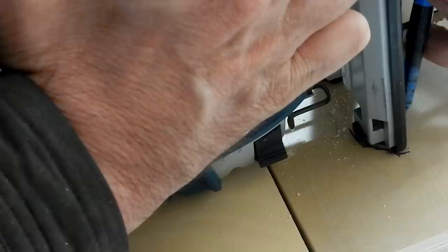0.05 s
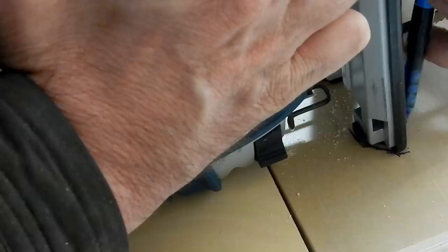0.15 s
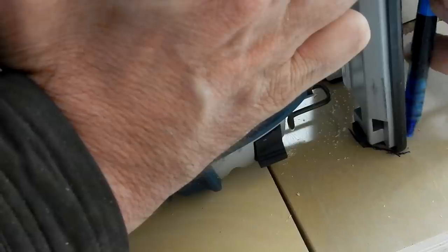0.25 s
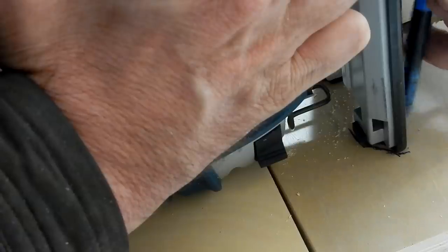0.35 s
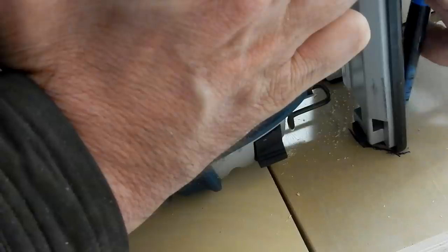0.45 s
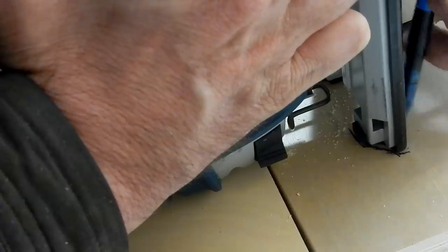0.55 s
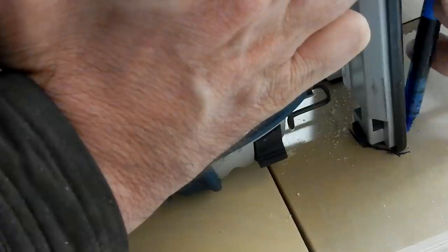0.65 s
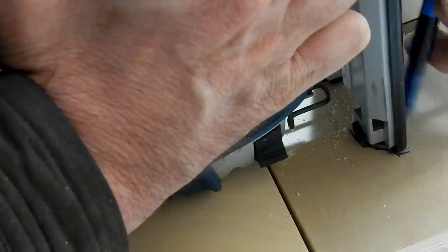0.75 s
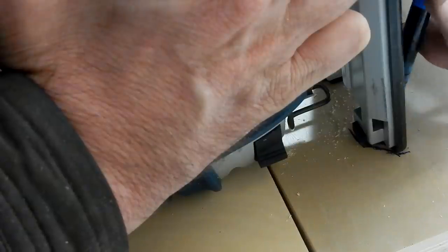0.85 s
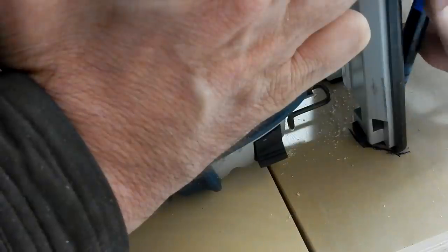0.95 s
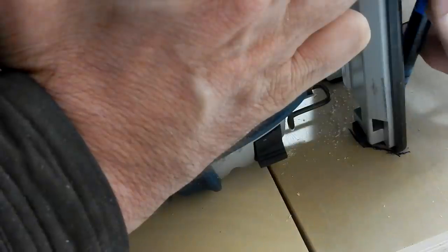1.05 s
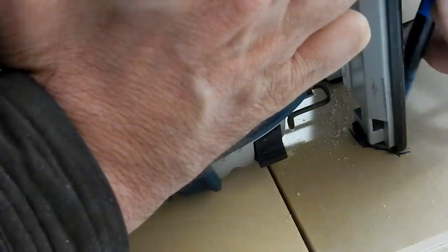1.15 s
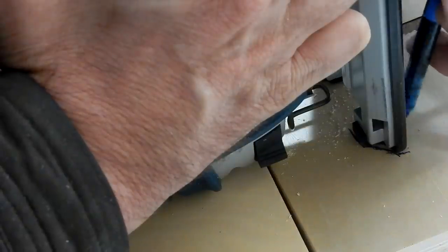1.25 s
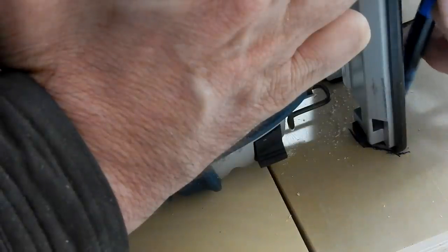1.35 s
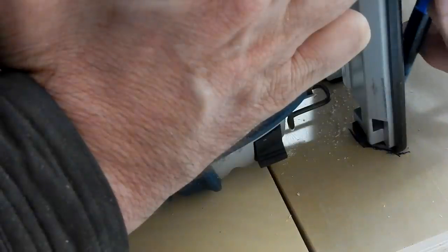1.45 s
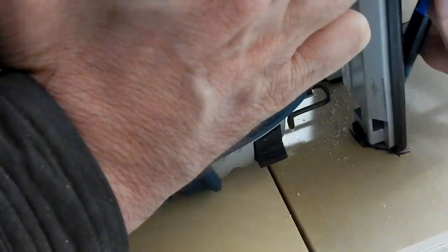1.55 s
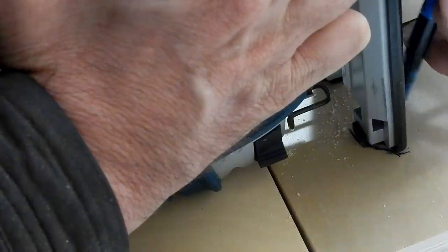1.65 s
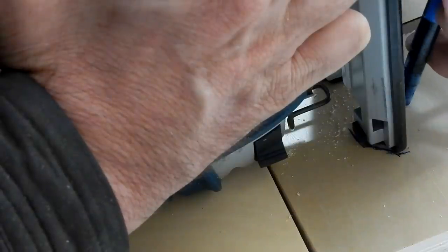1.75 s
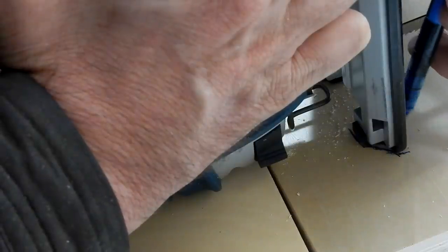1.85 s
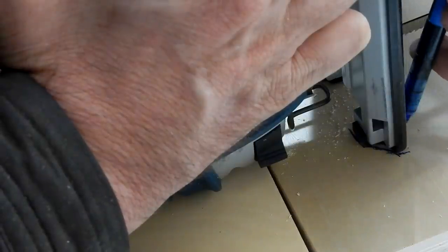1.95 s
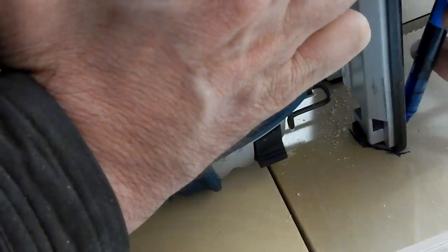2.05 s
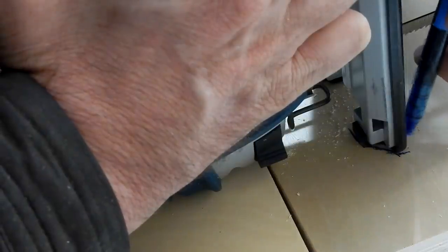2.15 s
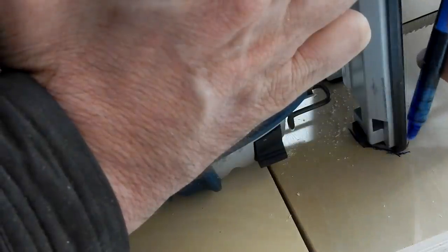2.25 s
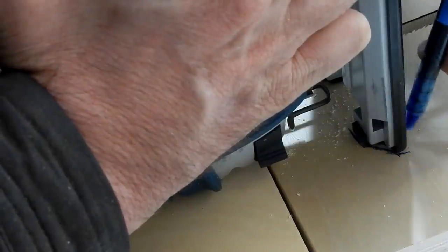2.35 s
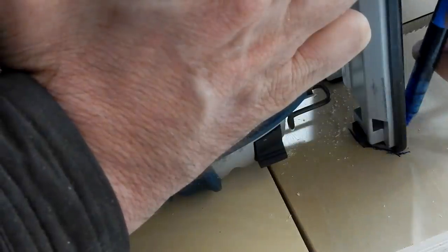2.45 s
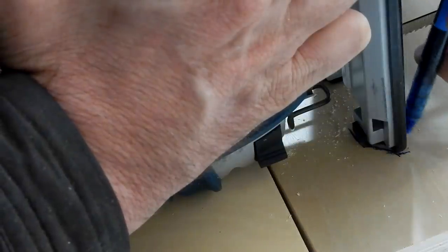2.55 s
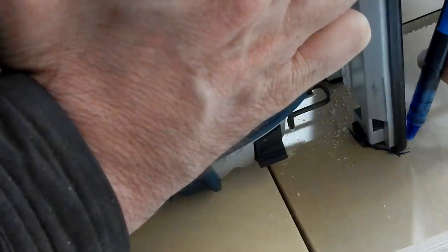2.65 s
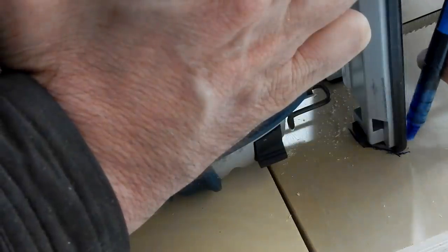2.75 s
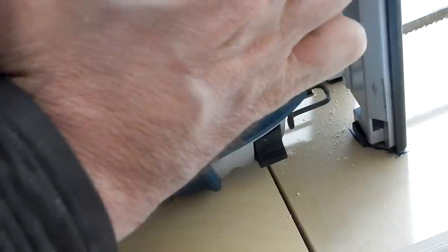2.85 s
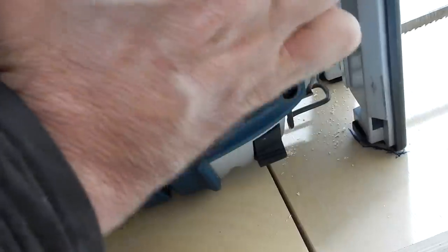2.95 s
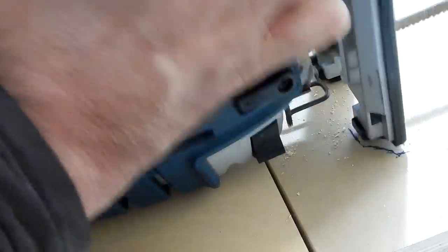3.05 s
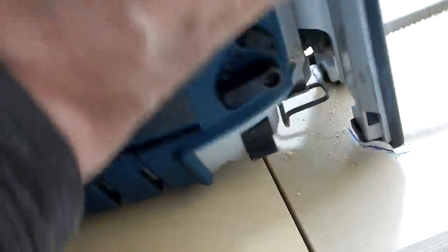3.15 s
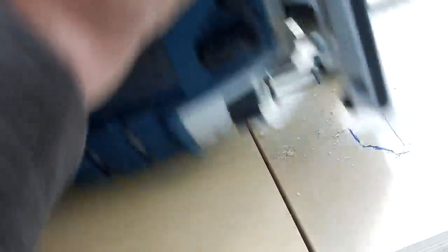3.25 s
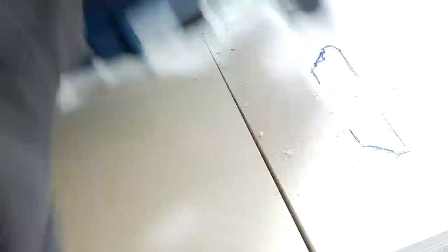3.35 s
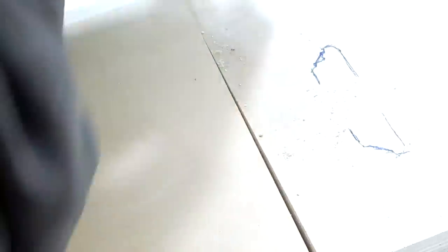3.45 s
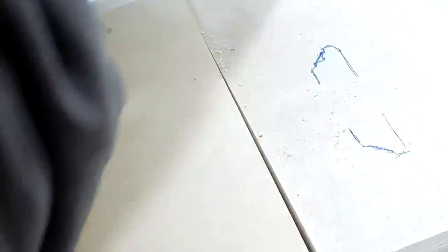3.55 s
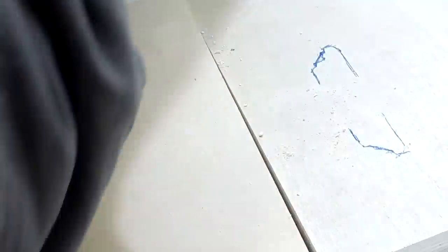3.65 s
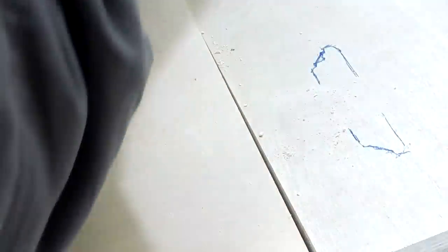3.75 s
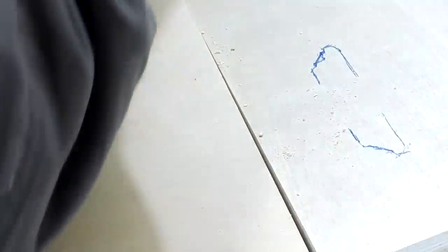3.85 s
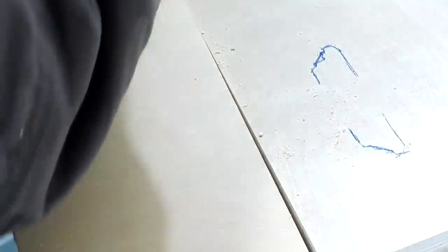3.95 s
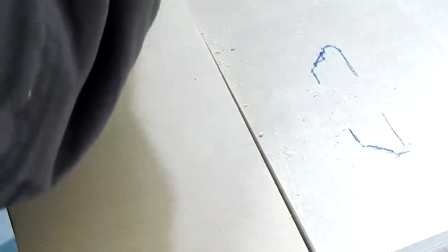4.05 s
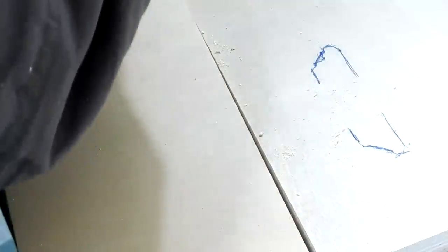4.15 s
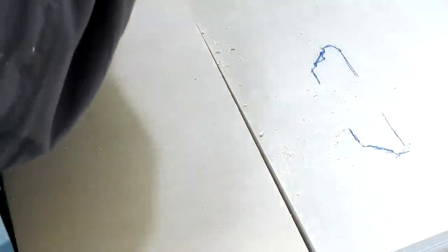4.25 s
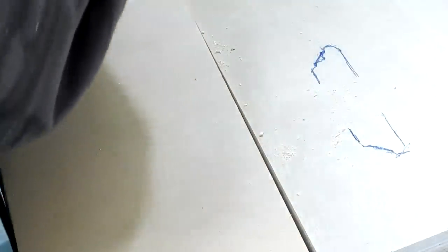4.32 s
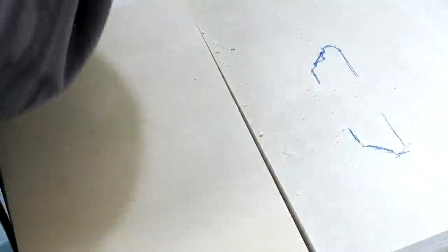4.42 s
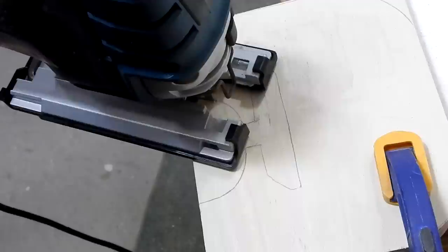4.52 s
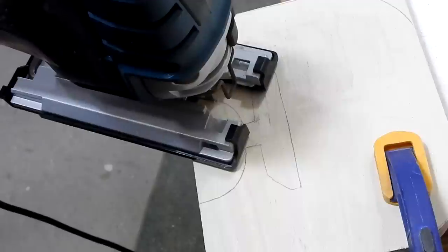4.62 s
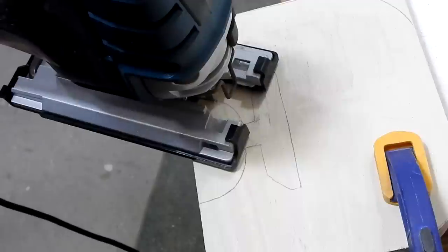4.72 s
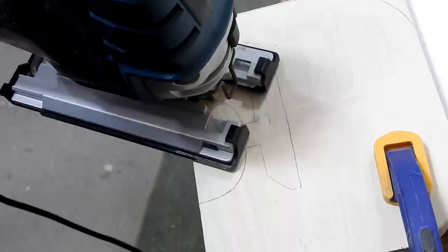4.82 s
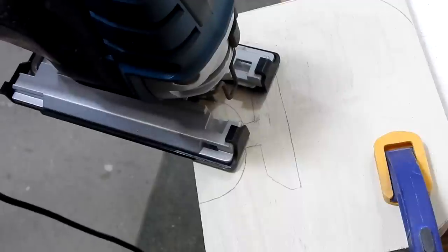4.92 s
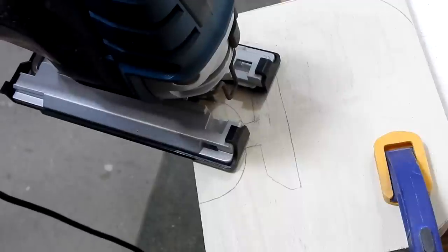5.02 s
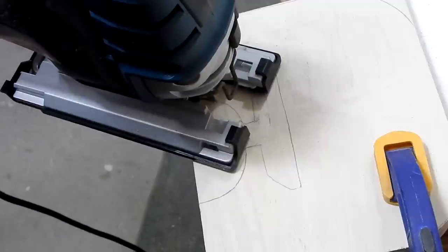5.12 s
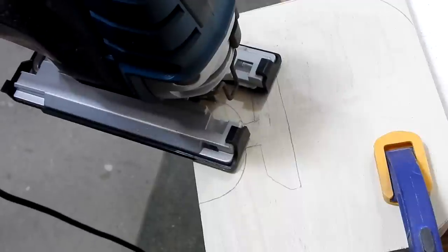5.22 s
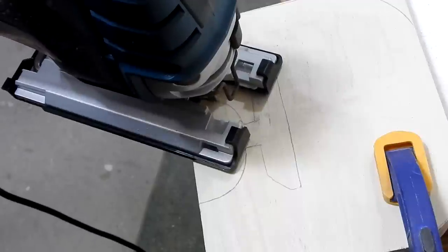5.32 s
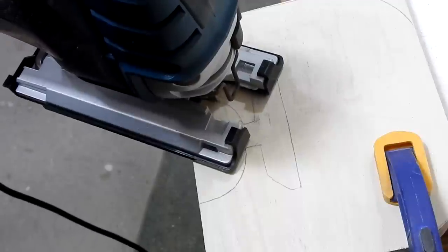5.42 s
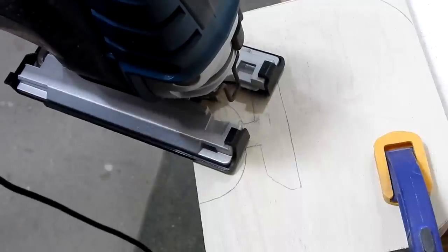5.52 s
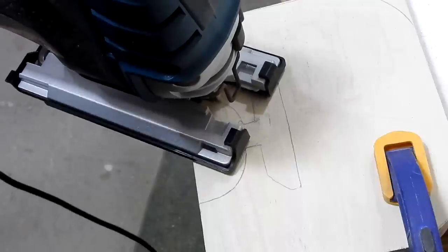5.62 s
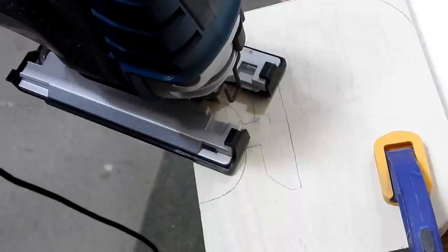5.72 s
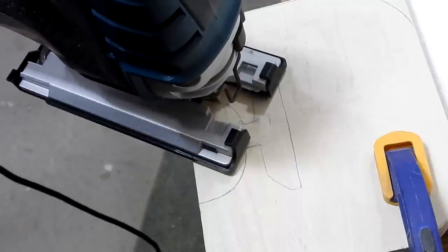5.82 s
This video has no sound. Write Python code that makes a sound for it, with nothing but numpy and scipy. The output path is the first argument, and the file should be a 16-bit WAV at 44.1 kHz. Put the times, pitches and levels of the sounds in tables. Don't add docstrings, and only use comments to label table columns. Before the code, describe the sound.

Close stereo microphone at a workshop bench: low room rumble, faint pen scratches and small ticks along a jigsaw's metal shoe. Around three seconds the tool is lifted with a knock and a sharp steel clack, cloth and dull scrapes follow, then it lands with a heavy woody thump. An abrupt cut brings the loud jigsaw, rattling, rasping and whining steadily to the end.

```python
import sys
import numpy as np
from scipy import signal
from scipy.fft import rfft, irfft, next_fast_len
from scipy.io import wavfile
from scipy.ndimage import map_coordinates

SR = 44100
rng = np.random.default_rng(int(sys.argv[2]) if len(sys.argv) > 2 else 0)


def pcm_store(signal):
    levels = np.round(np.clip(np.atleast_2d(signal), -1, 1) * 32767)
    wavfile.write(sys.argv[1], SR, levels.astype(np.int16).T)


def linear_from_db(decibels):
    return 10 ** (np.asarray(decibels, float) / 20)


N = 259308
T = np.arange(N) / SR
CUT_S = 4.566
RUNNING = T > CUT_S


def unit(x):
    return x / np.sqrt(np.mean(x ** 2) + 1e-20)


def along(points, hz):
    f, v = np.transpose(points)
    return np.interp(np.log(hz + 1), np.log(f + 1), v)


def curves(rows):
    s, *columns = np.transpose(rows)
    return [np.interp(T, s, column) for column in columns]


def wobble(rate_hz):
    knots = rng.standard_normal(int(N * rate_hz / SR) + 4)
    return map_coordinates(knots, [T * rate_hz])


def filtered(x, response):
    m = next_fast_len(N + 8192)
    return irfft(rfft(x, m) * response(np.fft.rfftfreq(m, 1 / SR)), m)[..., :N]


def resonant(x, modes):
    def response(f):
        total = 0
        for k, (hz, width, db) in enumerate(modes):
            total = total + (-1) ** k * linear_from_db(db) * 1j * f * width / (hz * hz - f * f + 1j * f * width)
        return total
    return filtered(x, response)


def rush(spectrum, alike, grit_db=0.):
    pair = rng.standard_normal((2, N)) * linear_from_db(grit_db * wobble(300))

    def response(hz):
        angle = np.arccos(np.clip(along(alike, hz), -1, 1)) / 2
        return linear_from_db(along(spectrum, hz)) * np.array([np.cos(angle), np.sin(angle)])
    mid, side = filtered(pair, response)
    return unit(np.array([mid + side, mid - side]))


def swells(rows):
    return sum(linear_from_db(db) * np.exp(-((T - s) / (0.36 * length)) ** 2) for s, length, db in rows)


def ring(modes, length_s, spread_db):
    t = np.arange(int(length_s * SR)) / SR
    tone = np.zeros(len(t))
    for hz, db, t60 in modes:
        tone += linear_from_db(db + spread_db * rng.normal() - 60 * t / t60) * np.sin(2 * np.pi * hz * t)
    return tone * (1 - np.exp(-t / 0.0013))


def add(into, s, x):
    into[round(s * SR):][:len(x)] += x


# start_s, level_db
THUMPS = [
    (.003, -32),
    (3.254, -38),
    (3.285, -34.5),
    (3.322, -45),
    (3.808, -46),
    (4.121, -20.5),
    (4.16, -15),
    (4.18, -20.5),
    (4.338, 2),
    (4.448, -34),
]
# pitch_hz, level_db, t60_s
BOARD_MODES = [(111, -12, 0.2), (160, -3, 0.22), (171, -4.5, 0.22), (205, -12, 0.16), (250, 0, 0.06),
               (305, -6, 0.08), (430, -9, .06)]


def board_thumps():
    out = np.zeros(N + SR)
    for s, db in THUMPS:
        add(out, s, linear_from_db(db - 4.5) * ring(BOARD_MODES, 0.4, spread_db=2.0))
    return out[:N]


# pitch_hz, likeness
ROOM_ALIKE = [(60, 1), (130, 0.86), (290, 0.74), (640, 0.77), (1410, 0.73), (3100, 0.68), (6820, 0.4),
              (15000, 0.12)]
# pitch_hz, density_db_per_hz
RUMBLE = [(12, -60), (20, -28), (43, -4), (65, -1), (91, -1), (108, -9), (151, -10), (220, -26),
          (250, -16.5), (320, -70), (550, -120)]
# pitch_hz, density_db_per_hz
SCRAPE = [(300, 1), (600, 1.5), (900, 4.5), (1500, 1.5), (2500, -2), (4000, -6), (6000, -14), (9000, -39)]
# pitch_hz, density_db_per_hz
HISS = [(3000, -19), (5000, 5), (8000, 3), (11000, -1), (13500, -1.5), (15000, -9), (16000, -30)]
# pitch_hz, density_db_per_hz
DRAG = [(100, -43), (180, -1.5), (400, -6.5), (800, -12), (1300, -35)]
# pitch_hz, width_hz, rms_db
HUMS = [(1750, 83, -71), (9600, 150, -81)]
# start_s, rubbing_db
BUSY = [(0.0, -59.5), (1.09, -58), (1.94, -61.5), (2.89, -59.5), (3.04, -51.5), (3.19, -54), (3.36, -41.5),
        (3.51, -53.5), (3.73, -53.5), (4.17, -56), (4.3, -48.5), (4.55, -50)]
# middle_s, length_s, level_db
SLEEVE_STROKES = [(0.261, 0.037, -54.5), (1.218, 0.023, -55.5), (2.215, 0.034, -50), (2.266, 0.043, -53),
                  (2.923, 0.098, -51), (3.129, 0.034, -40), (3.545, 0.17, -43.5), (3.668, 0.17, -52.5),
                  (3.735, 0.092, -56), (4.148, 0.0097, -37), (4.256, 0.37, -48), (4.31, 0.082, -50),
                  (.01, 0.04, -51)]
HISS_DB, HISS_FOLLOWS = -69, 1
DRAG_DB, DRAG_FOLLOWS, SLEEVE_DRAG_DB = -58, 0.26, -4
RUMBLE_DB, RUMBLE_FOLLOWS = -47, 0.14
REST_DB = -60
BUZZ_DB, BUZZ_T60_S = -29, 0.18


def bench():
    busy_db = curves(BUSY)[0]
    swing_db = busy_db - REST_DB
    rumble_db = RUMBLE_DB + RUMBLE_FOLLOWS * swing_db + 1.8 * wobble(5.65)
    rumble = linear_from_db(rumble_db) * rush(RUMBLE, ROOM_ALIKE)
    scrape = linear_from_db(busy_db) * rush(SCRAPE, ROOM_ALIKE, grit_db=1.5)
    hiss = linear_from_db(HISS_DB + HISS_FOLLOWS * swing_db) * rush(HISS, ROOM_ALIKE, grit_db=2.0)
    buzz = sum((T > s) * linear_from_db(db + BUZZ_DB - 60 * np.abs(T - s) / BUZZ_T60_S) for s, db in THUMPS)
    drag_gain = linear_from_db(DRAG_DB + DRAG_FOLLOWS * swing_db) + buzz + linear_from_db(SLEEVE_DRAG_DB) * swells(SLEEVE_STROKES)
    drag = drag_gain * rush(DRAG, ROOM_ALIKE)
    hums = np.zeros(N)
    for hz, width, db in HUMS:
        once = resonant(rng.standard_normal(N), [(hz, width, 0)])
        hums += linear_from_db(db) * unit(resonant(once, [(hz, width, 0)]))
    return rumble + scrape + hiss + drag + hums


# middle_s, length_s, level_db
PEN_STROKES = [(.42, 0.076, -50), (.462, 0.016, -57), (0.631, 0.048, -55), (0.691, 0.019, -52.5),
               (0.85, 0.09, -53), (1.29, 0.078, -61), (1.415, 0.029, -52.5), (1.47, 0.037, -54),
               (1.717, 0.095, -60), (1.93, 0.11, -63.5), (3.175, 0.073, -40.5), (3.385, 0.028, -51),
               (3.942, 0.18, -62), (4.362, 0.071, -40)]
# start_s, t60_s, dull_db, bright_db
WAKES = [
    (.838, 0.14, -52, -53),
    (2.835, 0.56, -54.5, -68),
    (3.13, 0.077, -58, -54),
    (3.258, 0.13, -44.5, -70),
    (3.335, 0.19, -40, -37.5),
    (3.481, 0.39, -40.5, -75),
    (4.118, 0.059, -38, -71),
    (4.159, 0.094, -38.5, -53),
    (4.338, 0.19, -24, -46),
]
# middle_s, length_s, level_db
SWISHES = [
    (3.95, 0.14, -53.5),
    (4.25, .16, -52),
    (3.6, 0.13, -54),
    (1.02, .25, -63),
]
# pitch_hz, density_db_per_hz
PEN = [(3000, -38), (4700, 6.5), (5600, 4), (7500, 5.5), (9000, 3), (11500, -3), (13500, -2), (15500, -8),
       (16200, -40)]
# pitch_hz, density_db_per_hz
CUFF = [(1500, -30), (2600, -3), (3400, 0), (4300, -6), (7000, -23)]
# pitch_hz, likeness
NEAR_ALIKE = [(500, 1), (10000, 0.89)]
PEN_SHINE_DB, SLEEVE_SHINE_DB = -2.5, -17


def strokes():
    pen, sleeve = swells(PEN_STROKES), swells(SLEEVE_STROKES)
    wakes = np.array([(T > s) * linear_from_db(-60 * np.abs(T - s) / t60) for s, t60, *_ in WAKES])
    dull, bright = linear_from_db(np.array(WAKES)[:, 2:].T) @ wakes
    dull = dull + pen + sleeve
    bright = bright + linear_from_db(PEN_SHINE_DB) * pen + linear_from_db(SLEEVE_SHINE_DB) * sleeve
    grain = linear_from_db(1.3 * wobble(120) + 2.1 * wobble(35))
    rubbing = grain * (dull * rush(SCRAPE, NEAR_ALIKE) + bright * rush(PEN, NEAR_ALIKE))
    return rubbing + swells(SWISHES) * rush(CUFF, NEAR_ALIKE)


# start_s, peak_db, ring_hz
PEN_TICKS = [(0.243, -47, 1620), (0.307, -43, 2000), (0.63, -32, 764), (0.652, -29, 1550),
             (0.685, -34, 905), (0.838, -39, 859), (1.217, -32, 950), (1.41, -36.5, 2640),
             (1.428, -38, 600), (2.012, -44, 1760), (2.206, -35, 802), (2.266, -29.5, 4270),
             (2.524, -26.5, 2520), (2.941, -29, 630), (3.387, -30, 1350), (4.525, -26, 1630)]
# start_s, peak_db, ring_hz
TOOL_TICKS = [(2.519, -30.5, 970), (2.918, -31.5, 3340), (3.124, -16, 3000), (3.138, -28, 633),
              (3.168, -24.5, 603), (3.257, -23.5, 600), (3.481, -27, 3000), (3.725, -34, 1340),
              (3.864, -39, 654), (4.117, -19.5, 680), (4.145, -23, 1220), (4.156, -23, 800),
              (4.339, -11, 2770)]
PEN_BRIGHT_DB, TOOL_BRIGHT_DB, TICK_T60_S = -9, -35, 0.016
SOFT_HZ = 6430


def ticks():
    out, t = np.zeros(N + SR), np.arange(SR // 8) / SR
    soft = signal.butter(2, SOFT_HZ, fs=SR)
    rise = 1 - np.exp(-t / 0.00034)
    for rows, bright_db in ((PEN_TICKS, PEN_BRIGHT_DB), (TOOL_TICKS, TOOL_BRIGHT_DB)):
        for s, db, hz in rows:
            grit = rng.standard_normal((2, len(t)))
            dull = signal.lfilter(*soft, signal.lfilter(*signal.iirpeak(hz, 1.2, SR), grit[0]))
            bright = signal.lfilter(*signal.iirpeak(5200, 1.1, SR), grit[1])
            decay = linear_from_db(db - 4.0 - 60 * t / TICK_T60_S)
            add(out, s, rise * decay * (unit(dull) + linear_from_db(bright_db) * unit(bright)))
    return out[:N]


# start_s, peak_db, crack_t60_s
CLACK = [
    (3.3234, -6.5, 0.013),
    (3.3272, -9.5, 0.018),
    (3.3308, -14, 0.023),
]
# pitch_hz, width_hz, level_db
STEEL = [(348, 170, -7), (605, 110, 0), (1321, 45, 6), (1570, 110, 6), (2250, 200, -5), (3230, 500, -4),
         (6800, 950, -25.5)]
# pitch_hz, level_db, t60_s
SHOE_MODES = [(1340, -38, 0.35), (1356, -39, 0.33), (1606, -38, 0.3)]


def shoe_clack():
    chatter, tail, t = np.zeros(N + SR), np.zeros(N + SR), np.arange(SR // 8) / SR
    for s, db, t60 in CLACK:
        add(chatter, s, linear_from_db(db - 60 * t / t60) * rng.standard_normal(len(t)))
    add(tail, CLACK[0][0], ring(SHOE_MODES, 0.46, spread_db=2.0))
    chatter = chatter[:N]
    soft = signal.butter(2, SOFT_HZ, fs=SR)
    crack = signal.lfilter(*soft, signal.lfilter(*signal.iirpeak(2600, 0.5, SR), chatter))
    return tail[:N] + linear_from_db(4.5) * crack + linear_from_db(11.0) * resonant(chatter, STEEL)


# pitch_hz, t60_s
SHOP = [(200, 0.47), (2000, 0.54), (10000, 0.064)]


def shop(x):
    hz, t, z = signal.stft(rng.standard_normal((2, SR // 2)), SR, nperseg=256)
    decay = linear_from_db(-60 * t / along(SHOP, hz)[:, None])
    mid, side = signal.istft(z * decay, SR, nperseg=256)[1]
    tail = mid + 0.071 * np.array([side, -side])
    late = np.pad(x, (300, 0))[None]
    return signal.fftconvolve(late, tail / np.linalg.norm(tail[0]), axes=1)[:, :N]


# start_s, whine_hz
SPEED = [(4.58, 11505), (4.66, 11510), (4.745, 11445), (4.85, 11515), (4.95, 11480), (5.06, 11470),
         (5.2, 11530), (5.27, 11490), (5.33, 11520), (5.5, 11450), (5.57, 11465), (5.68, 11495),
         (5.8, 11525), (5.88, 11520)]
STROKE_HZ, KNOCK_S = 28.75, 5.3463


def gearing():
    whine_hz = curves(SPEED)[0]
    turn = np.cumsum(STROKE_HZ * whine_hz / whine_hz[RUNNING].mean()) / SR
    return whine_hz, turn - turn[round(KNOCK_S * SR)]


def blows(turn, share, jitter, scatter_db):
    at = np.flatnonzero(np.diff(np.floor(turn - share + jitter * wobble(8))) > 0)
    train = np.zeros(N)
    train[at] = linear_from_db(scatter_db * (0.51 * wobble(8.7) + wobble(40)))[at]
    return train


# share_after_knock, plate_db, shell_db, guide_db
CONTACTS = [(-.06, 3.5, -0.5, -10), (.03, -3, 0, -0.5), (.1, 6, 1.5, 1), (0.191, 0, -7, 1.5),
            (0.33, 8.5, 2.5, -0.5), (.47, 8.5, 0.5, -4), (.54, -3, 1.5, 2.5), (0.671, 6.5, 2.5, -1.5),
            (0.791, -20, -4, -12)]
# pitch_hz, width_hz, level_db
PLATE = [(672, 45, -12.5), (890, 55, -3)]
# pitch_hz, width_hz, level_db
SHELL = [(1068, 83, 1.5), (1190, 71, 4), (1473, 97, -2.5)]
# pitch_hz, width_hz, level_db
GUIDE = [(1835, 51, -1.5), (2020, 120, -5), (2334, 93, 0.5), (2666, 92, -4), (3430, 140, -1.5)]
RATTLE_DB, RATTLE_SAGS_DB_PER_S = -2.5, 1.5


def gear_rattle(turn, load_db):
    hits = np.array([blows(turn, share, jitter=0.0027, scatter_db=2.24) for share, *_ in CONTACTS])
    into = linear_from_db(np.array(CONTACTS)[:, 1:].T) @ hits
    rattle = sum(resonant(x, modes) for x, modes in zip(into, (PLATE, SHELL, GUIDE)))
    level_db = load_db + RATTLE_DB - RATTLE_SAGS_DB_PER_S * (T - CUT_S)
    return linear_from_db(level_db + 1.15) * rattle / rattle[RUNNING].std()


# pitch_hz, width_hz, level_db
ROD = [(1800, 400, -7), (2300, 300, -5), (3400, 500, 0), (4400, 700, -6), (6300, 1500, -15)]
# pitch_hz, width_hz, level_db
THUD = [(530, 98, -9), (694, 77, 6.5), (1240, 570, -12)]
# pitch_hz, density_db_per_hz
CHIPS = [(2500, -33), (3500, -10), (6000, 2), (10000, 0), (15000, -15)]
# pitch_hz, likeness
SAW_ALIKE = [(60, 0.93), (130, 0.99), (290, 1), (640, 0.92), (1410, 0.99), (3100, 0.91), (6820, 0.87),
             (15000, 0.66)]
CHIPS_DB, CHIPS_T60_S = -10.5, 0.014


def rod_knock(turn, knock_db):
    blow = np.convolve(blows(turn, 0, jitter=0.002, scatter_db=0.8), np.hanning(7)[1:-1] / 3, "same")
    rod = linear_from_db(knock_db + 32.5) * resonant(blow, ROD)
    thud = linear_from_db(knock_db + 25.0) * resonant(np.roll(blow, -70), THUD)
    spray = signal.fftconvolve(blow, linear_from_db(-60 * T[:SR // 20] / CHIPS_T60_S))[:N]
    return rod + thud + linear_from_db(knock_db + CHIPS_DB) * spray * rush(CHIPS, SAW_ALIKE)


# stroke_rate_multiple, rms_db
ORDERS = [(2, -75), (3, -48), (5, -47.5), (6, -52), (7, -56), (8, -54.5), (9, -48), (10, -55), (11, -38),
          (12, -48), (13, -38.5), (17, -38)]


def balance_tones(turn):
    tones = np.zeros(N)
    for k, db in ORDERS:
        level = linear_from_db(db + 1.2 * wobble(7))
        cycles = k * turn + rng.random() + 0.024 * 1.2 * wobble(7)
        tones += level * np.sin(2 * np.pi * cycles)
    return tones


# pitch_hz, density_db_per_hz
TEETH = [(60, -41), (250, -21), (520, -10.5), (850, -7), (1200, -9), (1550, -2), (1850, -4), (2050, -5.5),
         (2320, 3.5), (2520, -12.5), (2750, -2.5), (3050, -4.5), (3420, -7), (4300, -12), (6000, -46)]
# pitch_hz, density_db_per_hz
FAN = [(3000, -12), (4500, 0.5), (6000, -3), (7000, -1), (8000, -0.5), (9500, 2), (10300, -0.5),
       (11300, 3.5), (12200, -2.5), (13500, -8), (15600, -9), (15900, -60)]
TEETH_DB, FAN_DB, FAN_FOLLOWS = -2.5, -29, 0.86


def teeth_and_fan(turn, load_db):
    bite = linear_from_db(-4.5 * (1 - np.cos(2 * np.pi * (turn - 0.13))))
    rasp = linear_from_db(load_db + TEETH_DB + 1.0) * bite * rush(TEETH, SAW_ALIKE, grit_db=-1.0)
    fan_db = FAN_DB + FAN_FOLLOWS * (load_db - load_db[RUNNING].mean())
    return rasp + linear_from_db(fan_db + 2.5) * bite ** 0.14 * rush(FAN, SAW_ALIKE)


def commutator_whine(turn, whine_hz, whine_db):
    lead_rad = np.array([[0.85], [-0.85]])
    side_db = np.array([[7], [0.6]])
    spin = 2 * np.pi * np.cumsum(whine_hz + 6 * wobble(60)) / SR + lead_rad
    tone = np.sin(spin) + 0.11 * np.sin(spin - 4 * np.pi * turn)
    return linear_from_db(whine_db + 0.94 * wobble(25) + side_db) * tone


# start_s, load_db, rod_knock_db, whine_db
MOTOR = [(4.58, -22, -25, -29), (4.73, -20.5, -18, -29), (4.9, -20, -21.5, -27.5),
         (5.05, -19.5, -15.5, -29), (5.18, -19.5, -15.5, -30), (5.3, -21, -16, -31),
         (5.55, -20.5, -12, -36.5), (5.72, -21.5, -12.5, -38), (5.88, -22.5, -14, -33)]
# pitch_hz, left_minus_right_db
SAW_PAN = [(60, 0), (180, -1), (550, -0.5), (1650, -1), (4970, 0), (15000, 5)]
# pitch_hz, width_hz, depth_0_to_1
DIP = (2500, 49, 1)


def jigsaw():
    whine_hz, turn = gearing()
    load_db, knock_db, whine_db = curves(MOTOR)
    body = gear_rattle(turn, load_db) + rod_knock(turn, knock_db) + balance_tones(turn)
    body = body + teeth_and_fan(turn, load_db)
    body = filtered(body, lambda hz: linear_from_db(along(SAW_PAN, hz) * np.array([[0.5], [-0.5]])))
    hz, width, depth = DIP
    body = body - min(depth, 1) * np.array([resonant(side, [(hz, width, 0)]) for side in body])
    whine = commutator_whine(turn, whine_hz, whine_db)
    return (body + whine) * np.clip((T - CUT_S) / 0.007, 0, 1)


def scene():
    hands = board_thumps() + ticks() + shoe_clack()
    quiet = hands + linear_from_db(-17.5) * shop(hands) + strokes() + bench()
    quiet = quiet * linear_from_db(np.array([[-0.5], [0.5]]))
    return quiet * np.clip((CUT_S + 0.002 - T) / 0.011, 0, 1) + jigsaw()


def band_limit(x):
    return signal.sosfilt(signal.butter(12, 16520, fs=SR, output="sos"), x)


# pitch_hz, level_db
MIC = [(20, 0), (14500, 0), (15700, -4), (15950, -22), (16400, -32), (16480, -120)]


def record(dry):
    soft = dry / (1 + np.abs(dry / 0.98) ** 6) ** (1 / 6)
    mix = filtered(soft, lambda hz: linear_from_db(along(MIC, hz)))
    return band_limit(mix)


dry = scene()
out = record(dry)
pcm_store(out)
```